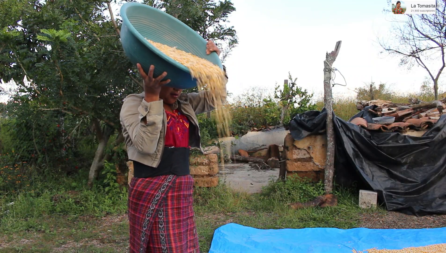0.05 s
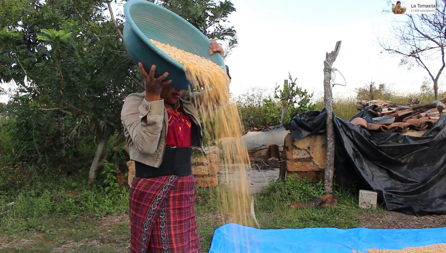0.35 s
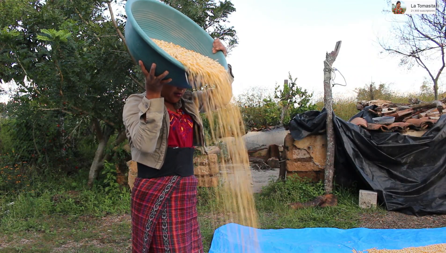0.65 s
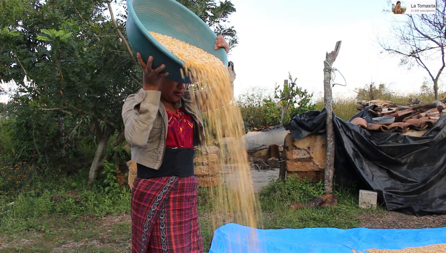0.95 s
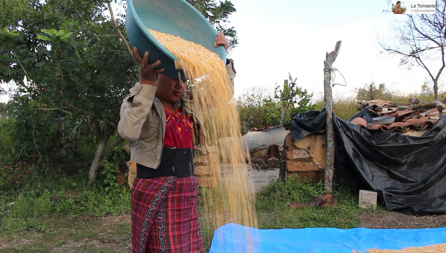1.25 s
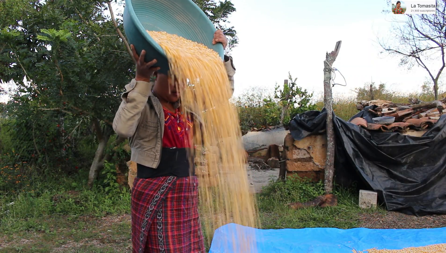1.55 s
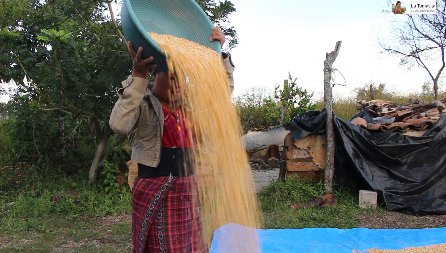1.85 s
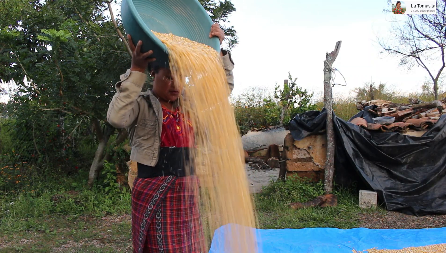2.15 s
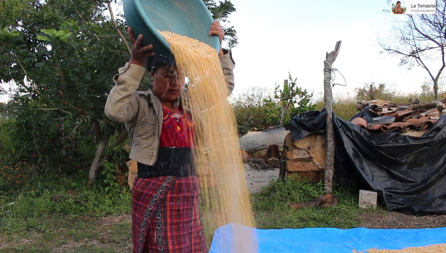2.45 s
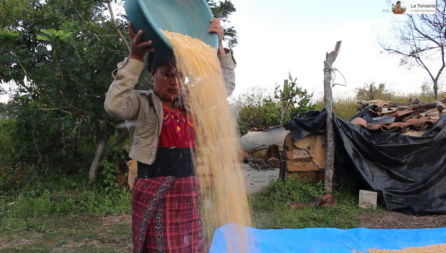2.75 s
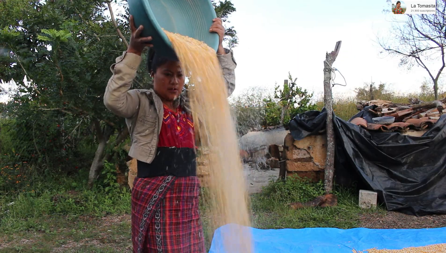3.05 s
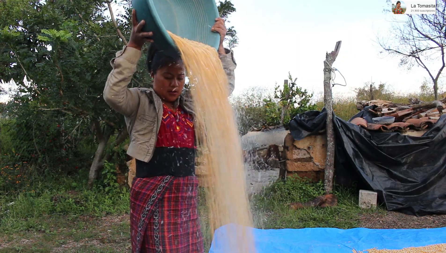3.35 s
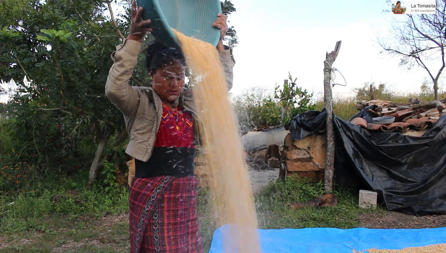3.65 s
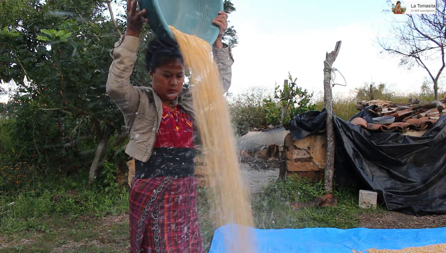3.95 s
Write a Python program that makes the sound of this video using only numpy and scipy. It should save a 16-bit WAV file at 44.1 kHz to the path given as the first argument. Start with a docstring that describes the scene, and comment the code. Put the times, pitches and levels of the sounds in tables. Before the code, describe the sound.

Corn pouring from a plastic basin rattles and hisses on a tarp, with light wind puffs.

```python
"""Dry corn kernels pour onto a tarp outdoors, sliding out of a plastic basin, a little to the right.
The first kernels snap on the bare sheet and thicken into a dense rattle. As a heap covers the tarp,
the rattle turns into a finer hiss of kernel on kernel, with hollow pops from loose folds.
The basin is bumped twice and booms dully; wind puffs and thuds on the microphone."""
import sys
import numpy as np
from scipy import signal
from scipy.fft import rfft, irfft, next_fast_len
from scipy.io import wavfile

SR = 44100
rng = np.random.default_rng(int(sys.argv[2]) if len(sys.argv) > 2 else 0)


def master(y):
    """Save y as 16-bit WAV."""
    cut = np.clip(np.atleast_2d(y).T, -1, 1)
    pcm = np.round(cut * 32767)  # scale
    wavfile.write(sys.argv[1], SR, pcm.astype(np.int16))


N = 176400
T = np.arange(N) / SR
FFT_SIZE = next_fast_len(N + 8192, real=True)
HZ = np.maximum(np.arange(FFT_SIZE // 2 + 1) * SR / FFT_SIZE, 1)
LANDING_S = .41   # the stream reaches the tarp


def from_db(db):
    """Decibels to gain."""
    return 10 ** (np.asarray(db) / 20)


def unit_rms(x):
    """Scale to unit rms."""
    return x / np.sqrt(np.mean(np.abs(x) ** 2) + 1e-20)


def envelope(rows):
    """Straight ramps through (time_s, value) breakpoints."""
    return np.interp(T, *np.transpose(rows))


def over_frequency(points):
    """A curve through (freq_hz, value) breakpoints on a log frequency axis."""
    hz, value = np.transpose(points)
    return np.interp(np.log(HZ), np.log(np.maximum(hz, 1)), value)


def flutter(rate_hz):
    """Smooth random modulation of unit rms, rolling off above rate_hz."""
    hop, warm_up = 40, 2000
    pole = np.exp(-2 * np.pi * rate_hz * hop / SR)
    noise = rng.standard_normal(N // hop + warm_up + 2)
    slow = signal.lfilter([1], [1, -2 * pole, pole * pole], noise)[warm_up:]
    return np.interp(np.arange(N) / hop, np.arange(len(slow)), unit_rms(slow))


def colour(x, spectrum):
    """Minimum-phase EQ with unit power gain: nothing rings ahead of an attack."""
    cepstrum = irfft(np.log(from_db(over_frequency(spectrum))), FFT_SIZE)
    cepstrum[1:FFT_SIZE // 2] *= 2
    cepstrum[FFT_SIZE // 2 + 1:] = 0
    response = unit_rms(np.exp(rfft(cepstrum)))
    return irfft(rfft(x, FFT_SIZE) * response, FFT_SIZE)[..., :N]


def ring(clicks, hz, t60_s):
    """A resonator: a unit click starts a decaying sine of height 1."""
    pole, step = from_db(-60 / (t60_s * SR)), 2 * np.pi * hz / SR
    return signal.lfilter([0, np.sin(step)], [1, -2 * pole * np.cos(step), pole * pole], clicks + 1e-18)


def clicks_at(start_s, level_db):
    """Single clicks at the given times and levels."""
    out = np.zeros(N)
    out[np.clip(np.asarray(start_s) * SR, 0, N - 1).astype(int)] = from_db(level_db)
    return out


def impacts(per_s, spread_db):
    """Random clicks of uneven size, about unit rms at any rate."""
    size_db = spread_db * np.minimum(rng.exponential(1, N), 4.14)
    sizes = unit_rms(from_db(size_db)) * rng.choice([-1, 1], N)
    chance = per_s / SR
    return sizes * (rng.random(N) < chance) / np.sqrt(chance)


def contact(clicks, spectrum, ring_s, ring_share):
    """Each click becomes a sharp tick and a short noisy shiver; returns direct and scattered sound."""
    pole = np.exp(-2 / (ring_s * SR))
    energy = signal.lfilter([1 - pole], [1, -pole], clicks ** 2 + 1e-18)
    shiver = np.sqrt(energy) * rng.standard_normal((2, N))
    ticks = np.array([clicks, clicks * rng.choice([-1, 1], N)])
    return colour(np.sqrt(1 - ring_share) * ticks + np.sqrt(ring_share) * shiver, spectrum)


# How alike the corn sounds in the two channels: freq_hz, correlation (0 to 1)
CORN_LIKENESS = [(150, .2), (380, .72), (700, .96), (2400, .975), (4400, .92), (8100, .68), (15000, .15)]
# Pan of the corn: freq_hz, left_minus_right_db
CORN_PAN = [(60, -3), (120, -10), (240, -10), (480, -12), (950, -11.5), (1890, -9.5), (3770, -7.0),
            (7520, -6), (15000, 0.5)]

def place(pair):
    """Direct and scattered sound to stereo: the mids lean right, the top is diffuse."""
    direct, scattered = rfft(pair, FFT_SIZE)
    alike = over_frequency(CORN_LIKENESS)
    lean = from_db(over_frequency(CORN_PAN) / 2)
    stereo = np.sqrt((1 + alike) / 2) * direct + np.sqrt((1 - alike) / 2) * scattered * [[1], [-1]]
    pan = np.array([lean, 1 / lean]) * 2 / (lean + 1 / lean)
    return irfft(stereo * pan, FFT_SIZE)[:, :N]


# Faint bed of breeze: time_s, level_db
BREEZE_LEVEL = [(0, -48), (0.5, -49.5), (0.9, -45.5), (1.7, -47.5), (1.95, -59.5), (4, -55)]
# Puffs on the microphone: peak_s, level_db, half_length_s
WIND_PUFFS = [(0.673, -32, 0.014), (0.738, -33, 0.017), (0.79, -32, 0.013), (0.89, -44, 0.025),
              (1.025, -46, 0.011), (1.107, -38, 0.011), (1.19, -40, 0.022), (1.44, -33, 0.02),
              (1.532, -44, 0.013), (1.658, -42, .015), (1.765, -40, .012)]
# Tone of the wind rumble: freq_hz, level_db
WIND_EQ = [(20, -34), (45, -4), (75, 2), (150, -4), (250, -12), (400, -23), (1000, -83)]

def wind():
    """Low lumpy puffs over a faint breeze, partly out of phase between the channels."""
    puffs = sum(from_db(db) * np.exp(-((T - peak_s) / half_s) ** 2 / 2)
                for peak_s, db, half_s in WIND_PUFFS)
    strength = from_db(envelope(BREEZE_LEVEL)) + puffs
    shared, left, right = colour(rng.standard_normal((3, N)), WIND_EQ)
    return strength * np.array([.5 * left - 0.42 * shared, .5 * right + 0.91 * shared])


# Single eddies on the microphone: start_s, level_db, pitch_hz, left_minus_right_db
EDDIES = [(0.67, -26, 95, -10), (0.7177, -16, 220, 7.5), (0.7368, -22.5, 130, 14),
          (0.7718, -17.5, 165, 10.5), (0.899, -27, 85, -11), (1.02, -23, 90, -6), (1.1126, -21.5, 200, 7),
          (1.4115, -26, 140, -9), (1.427, -21, 130, -6.5), (1.521, -28, 95, -10), (1.76, -24, 149, -7.5)]

def wind_buffets():
    """An eddy thuds on one microphone port: a damped swing or two, inverted in the other channel."""
    decay_cycles = 6.2
    out = 0
    for start_s, db, hz, lean_db in EDDIES:
        swing = ring(clicks_at([start_s], db), hz, t60_s=decay_cycles / hz)
        out = out + swing * from_db([[lean_db / 2], [-lean_db / 2]]) * [[-1], [1]]
    return signal.sosfilt(signal.butter(2, [45, 330], "band", fs=SR, output="sos"), out)


# Dull bumps on the basin, the second a double hit: start_s, level_db
BASIN_HITS = [(2.7733, -31), (3.1655, -31), (3.178, -34)]
# Body modes of the plastic basin: pitch_hz, level_db, t60_s
BASIN_MODES = [(94, -7, 0.31), (123, -2, .07), (158, 2, 0.086), (243, 7, 0.097), (318, 2.5, 0.19)]

def basin_bumps():
    """Each bump sets all the low modes of the basin booming at once."""
    boom = sum(ring(clicks_at([start_s], db + mode_db), hz, t60_s)
               for start_s, db in BASIN_HITS for hz, mode_db, t60_s in BASIN_MODES)
    low_band = signal.butter(2, [75, 400], "band", fs=SR, output="sos")
    return signal.sosfilt(low_band, boom) * from_db([[-13], [.8]])   # panned right


# Tone of kernels sliding on plastic: freq_hz, level_db
SLIDE_EQ = [(100, -18), (250, -10), (450, -8), (600, -3), (760, -6.5), (1300, -1), (2700, -3.5), (5200, -7),
            (6300, -9.5), (7600, -9.5), (10000, -15), (15500, -30)]

def rim_slide():
    """Kernels jostle in small surges on their way over the rim of the basin."""
    level_db = -35 + flutter(rate_hz=27)
    clicks = impacts(per_s=3500, spread_db=3.0) * from_db(level_db)
    return contact(clicks, SLIDE_EQ, ring_s=0.0039, ring_share=0.8)


# Kernels striking loose folds of the tarp: start_s, level_db, pitch_hz
FOLD_HITS = [(3.118, -13, 1300), (3.126, -9.5, 1700), (3.145, -10, 2100), (3.154, -8, 1910),
             (3.168, -10, 1850), (3.175, -5.5, 1900), (3.190, -10, 1900), (3.203, -13, 1400),
             (3.2923, -6.5, 1870), (3.296, -12, 1600), (3.327, -11, 3400), (3.3993, -7.5, 1500),
             (3.402, -15, 1000), (3.442, -10, 1400), (3.507, -11.5, 1000), (3.541, -13, 2520),
             (3.622, -10, 1810), (3.634, -10.5, 1130), (3.636, -8.5, 3400), (3.657, -12, 2610),
             (3.661, -7, 1750), (3.686, -11.5, 1450), (3.778, -11.5, 1150), (3.863, -14, 1640),
             (3.885, -11.5, 1080), (3.922, -13, 1200), (3.953, -10, 1100), (3.937, -13, 900),
             (3.978, -12, 950)]

def fold_pops():
    """Struck folds give short hollow pops: loud accents and a growing scatter of weak strays."""
    pop_cycles, stray_cycles = 6.1, 7.7   # cycles to die away
    pops = sum(ring(clicks_at(start_s, db), hz, pop_cycles / hz) for start_s, db, hz in FOLD_HITS)
    # The hollow under the fold rings on after each accent.
    start_s, db, _ = np.transpose(FOLD_HITS)
    pops += ring(clicks_at(start_s, db - 18), hz=1053, t60_s=0.025)
    stray_pitches_hz = np.geomspace(750, 2000, 8)
    strays_per_s = envelope([(1.1, 0), (3.6, 180)])
    for hz in stray_pitches_hz:
        struck = rng.random(N) < strays_per_s / len(stray_pitches_hz) / SR
        stray_db = -26 + 3.8 * rng.standard_normal(N)
        pops += ring(struck * from_db(stray_db), hz, stray_cycles / hz)
    low_cut = signal.butter(2, 1050, "high", fs=SR, output="sos")
    return signal.sosfilt(low_cut, pops) * from_db([[-4], [5.5]])   # panned right


# Tone of a crinkling fold: freq_hz, level_db
CRINKLE_EQ = [(300, -33), (700, -12), (1100, -3), (2000, 1), (3800, 1), (5500, -10), (16000, -35)]

def fold_crinkles():
    """A popped fold crinkles for a few milliseconds."""
    start_s, db, _ = np.transpose(FOLD_HITS)
    return contact(clicks_at(start_s, db + 8.5), CRINKLE_EQ, ring_s=0.0031, ring_share=0.93)


# Build of the hiss on the heap: time_s, level_db, hits_per_s
HEAP_BUILD = [(0.45, -44, 860), (0.8, -29, 2600), (1.6, -30, 4800), (2.4, -31.5, 6600), (3.0, -25.5, 13000),
              (3.5, -24.5, 15800), (4.0, -22.5, 17000)]
# Tone of kernel on kernel: freq_hz, level_db
HEAP_EQ = [(180, -43), (300, -15), (519, -16.5), (565, -20), (603, -11), (1060, -4.5), (2170, -6),
           (3830, -4), (6000, -6), (6650, -7), (7450, -4.5), (8360, -4), (13300, -13), (16000, -21)]

def heap_hiss():
    """Kernel on kernel: bright ticks that merge into a hiss as the heap grows."""
    time_s, db, per_s = np.transpose(HEAP_BUILD)
    clicks = impacts(np.interp(T, time_s, per_s), spread_db=4.0)
    level_db = np.interp(T, time_s, db) + 0.8 * flutter(rate_hz=45)
    clicks *= from_db(level_db) * (T > LANDING_S)
    return contact(clicks, HEAP_EQ, ring_s=.001, ring_share=0.4)


# Single hard hits on the tarp: start_s, crack_db, knock_db
SNAP_HITS = [(0.3811, 7, -11), (0.3948, -4, 6), (0.4016, -11, 3), (0.4074, 4, 2), (0.4182, -7, -3),
             (0.4262, -15, -1), (0.4378, -7, -10), (0.441, -8, -11), (0.4457, -11, 2), (0.4515, -0.5, 1),
             (0.463, -14, 1), (0.4696, 1, 4.5), (0.476, -11, -1), (0.485, -1, 3), (0.4965, -11, -1),
             (0.5075, -3, 2), (0.516, 2, -5), (0.53, -7, -1), (0.534, -6, -2), (0.5428, 3.5, 1),
             (0.5475, -2, -8), (0.6997, 4, -9), (0.916, 0, -4), (1.2086, 8, 5), (1.213, 2, 2),
             (1.265, 1, -6), (1.634, -3, -2), (1.8503, 2, 7), (2.3685, -2, -6), (2.653, 0, -6)]
# Tone of the crack: freq_hz, level_db
CRACK_EQ = [(200, -40), (600, -10.5), (1500, -8), (3700, -2), (6000, -3.5), (8000, -4), (11000, -11.5),
            (16000, -31)]
# Ring of the bare tarp, for both the knocks and the rattle: freq_hz, level_db
BARE_TARP_EQ = [(180, -39.5), (300, -15.5), (337, -17.5), (379, -10.5), (478, -12.5), (511, -8), (614, -7),
                (656, -3), (828, -6), (1040, -3.5), (1190, -9.5), (1530, -4), (1810, -1), (2440, -4),
                (2650, -2), (3080, -3), (3450, 0.5), (5600, -8), (6750, -12), (7500, -9.5), (8400, -11),
                (15000, -38), (16000, -35)]

def kernel_snaps():
    """A kernel lands hard: a bright crack, a short knock of the sheet and a faint shivering tail."""
    start_s, crack_db, knock_db = np.transpose(SNAP_HITS)
    knock_clicks = clicks_at(start_s, knock_db)
    crack = contact(clicks_at(start_s, crack_db), CRACK_EQ, ring_s=0.0013, ring_share=0.83)
    knock = contact(knock_clicks, BARE_TARP_EQ, ring_s=0.0021, ring_share=0.94)
    tail = contact(knock_clicks, BARE_TARP_EQ, ring_s=0.02, ring_share=0.87)
    return crack + knock + from_db(-6.5) * tail


# Envelope of the stream hitting the tarp: time_s, level_db
RATTLE_LEVEL = [(0.42, -32), (0.475, -31), (0.5, -23.5), (0.58, -19.5), (0.8, -17.5), (0.95, -18.5),
                (1.1, -19), (1.35, -19), (1.65, -16.5), (1.84, -16.5), (1.95, -18.5), (2.35, -19),
                (2.7, -21.5), (2.85, -21.5), (3.05, -25), (3.17, -26.5), (3.27, -30), (4.0, -35.5)]
# Tone of the tarp under a layer of corn: freq_hz, level_db
COVERED_TARP_EQ = [(200, -32.5), (400, -22.5), (650, -15), (1050, -9), (1500, -6), (2000, -4.5),
                   (3000, -1.5), (3450, 1), (4300, -1.5), (5200, -4.5), (6700, -8), (7500, -7.5),
                   (8500, -8.5), (11000, -16.5), (16000, -39)]

def tarp_rattle():
    """The stream thickens and lands in clumps; the sheet loses its low ring as corn covers it."""
    per_s = envelope([(LANDING_S, 700), (LANDING_S + .4, 7500)])
    dip_db = 5.5 * np.exp(-((T - 1.887) / 0.014) ** 2)   # the level dips briefly
    clumps_db = 1.02 * flutter(rate_hz=76)
    level_db = envelope(RATTLE_LEVEL) - dip_db + clumps_db
    clicks = impacts(per_s, spread_db=3.5) * from_db(level_db) * (T > LANDING_S)
    cover = envelope([(1.06, 0), (2.51, 1)])   # equal-power crossfade from bare to covered
    bare = contact(clicks * np.sqrt(1 - cover), BARE_TARP_EQ, ring_s=0.0014, ring_share=0.46)
    covered_clicks = clicks * np.sqrt(cover) * rng.choice([-1, 1], N)
    covered = contact(covered_clicks, COVERED_TARP_EQ, ring_s=0.002, ring_share=0.34)
    return bare + covered


def scene():
    """The corn, placed to the right, over the basin bumps and the wind."""
    corn = rim_slide() + tarp_rattle() + heap_hiss() + kernel_snaps() + fold_crinkles()
    return place(corn) + fold_pops() + basin_bumps() + wind() + wind_buffets()


def record(dry):
    """A soft clip rounds the highest peaks and a steep low-pass trims the top."""
    ceiling, cutoff_hz = .92, 16550
    rounded = dry / (1 + (dry / ceiling) ** 4) ** .25
    return signal.sosfilt(signal.cheby2(16, 70, cutoff_hz, fs=SR, output="sos"), rounded)


dry = scene()
out = record(dry)
master(out)
```